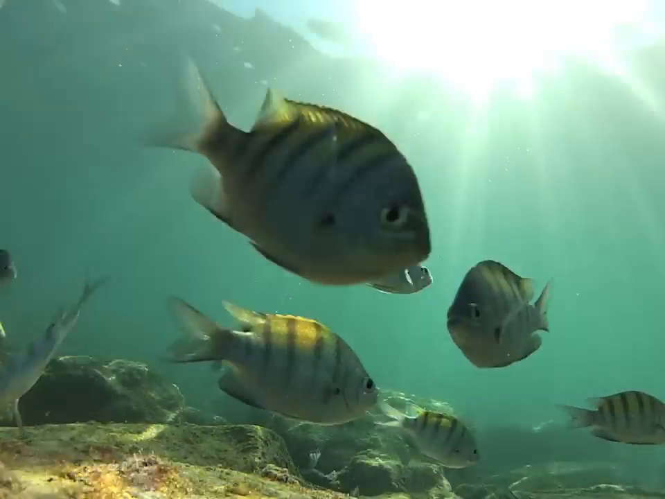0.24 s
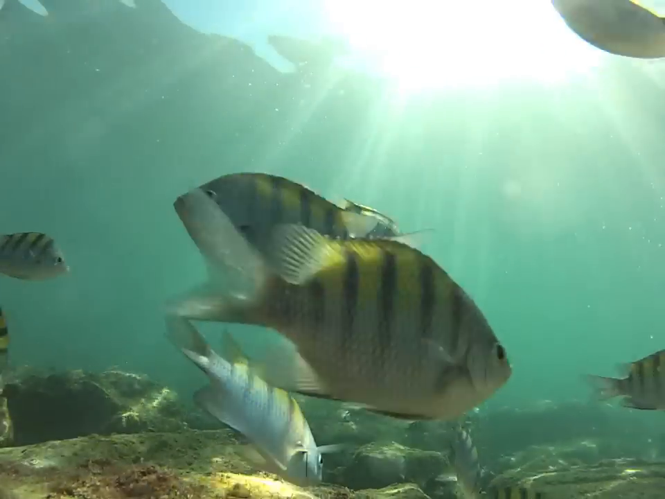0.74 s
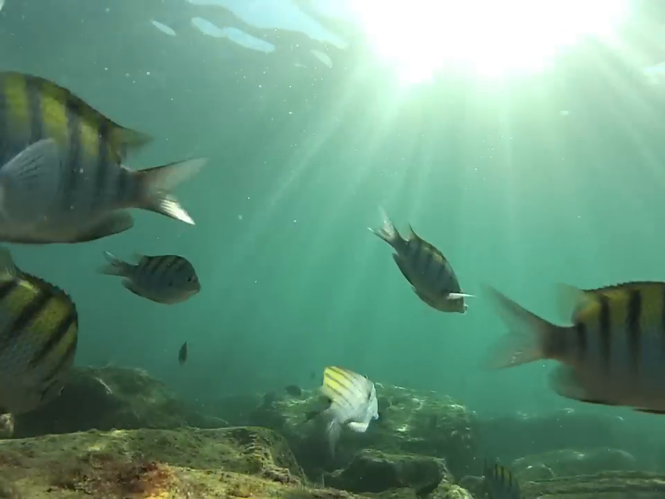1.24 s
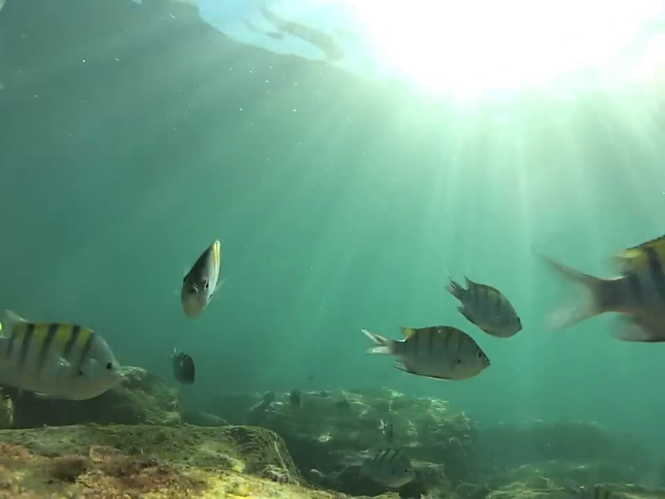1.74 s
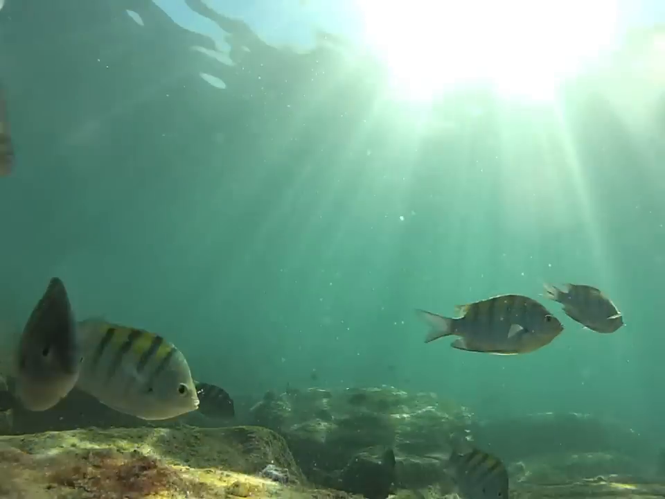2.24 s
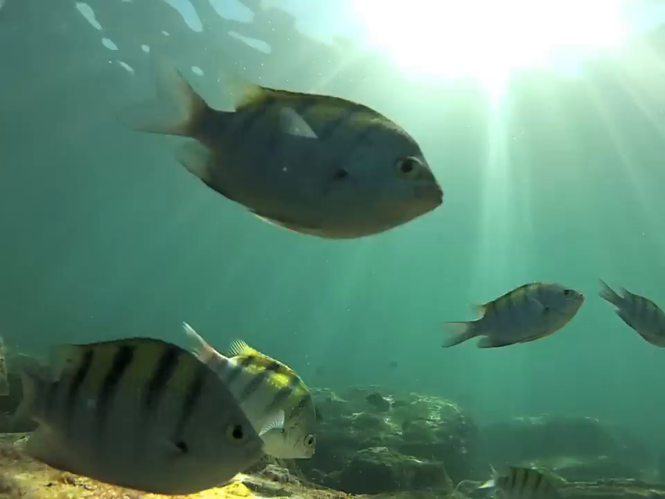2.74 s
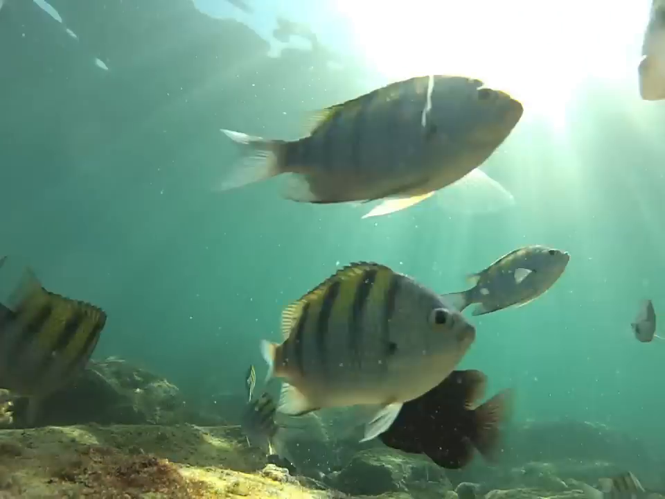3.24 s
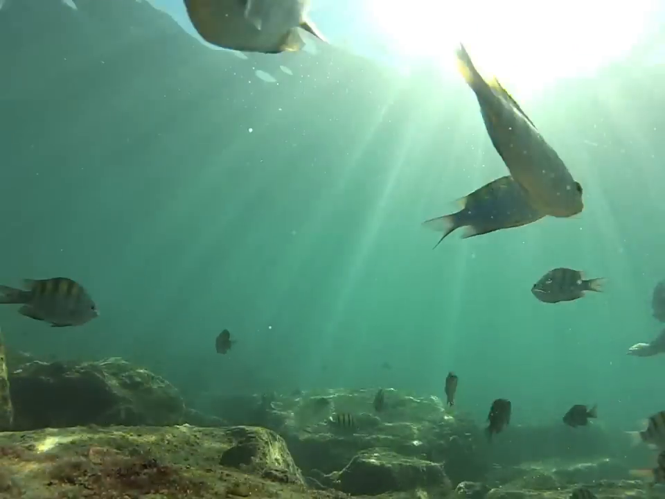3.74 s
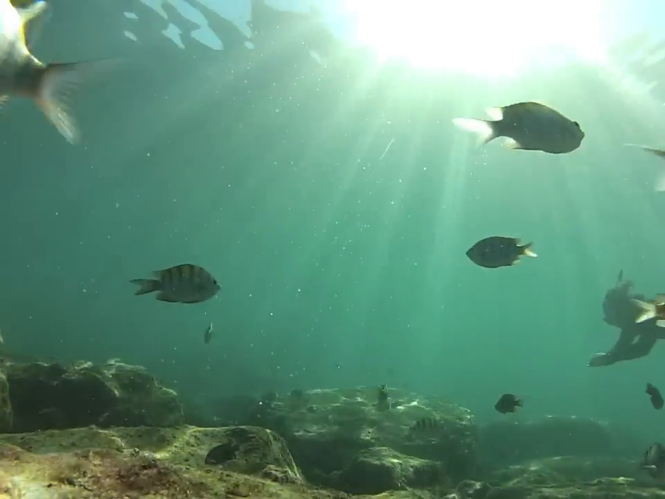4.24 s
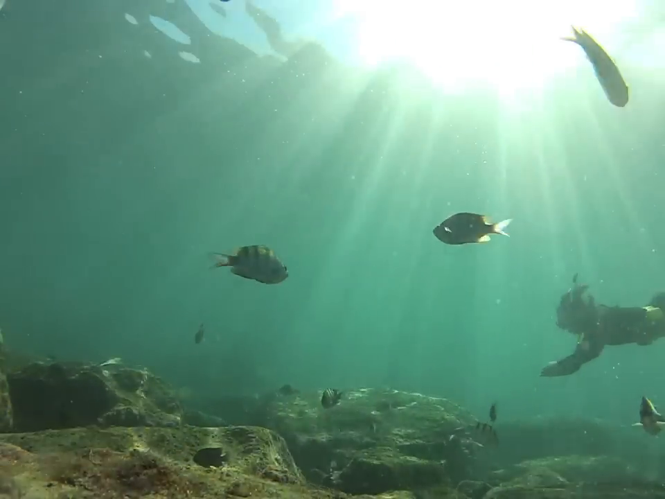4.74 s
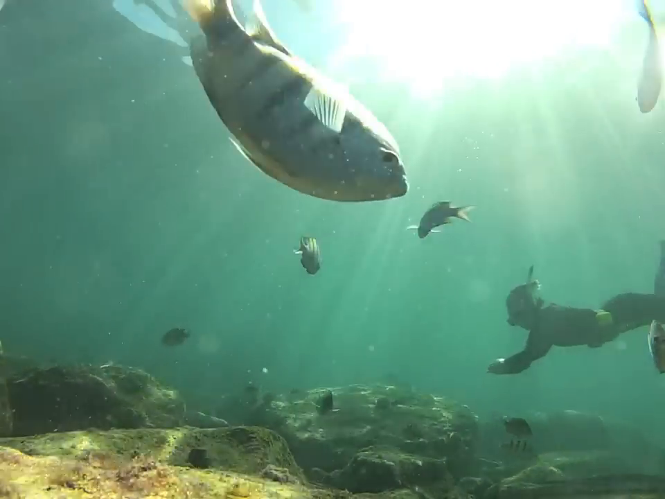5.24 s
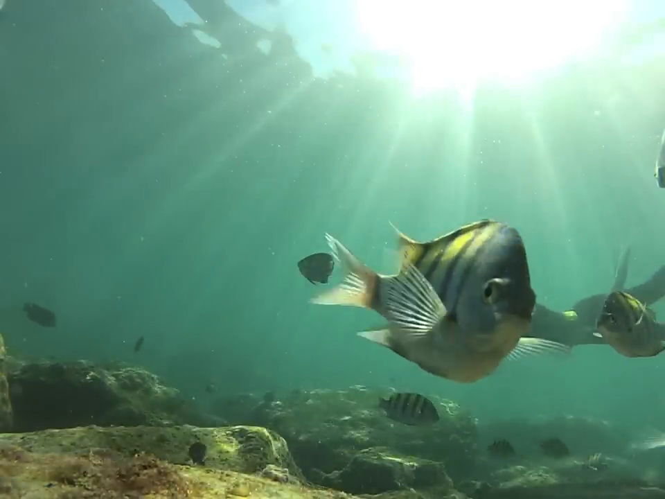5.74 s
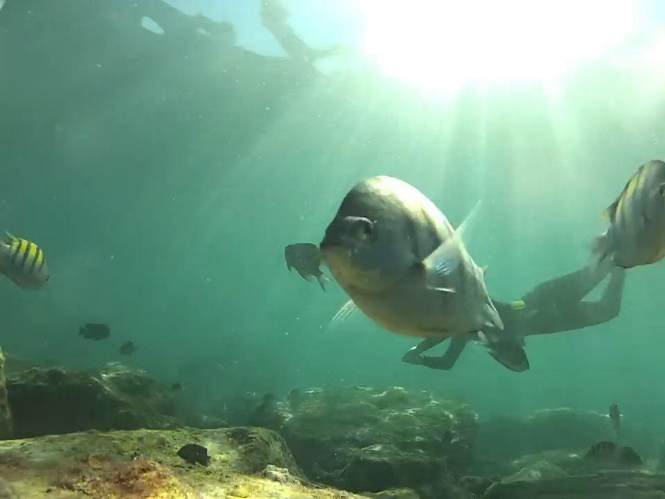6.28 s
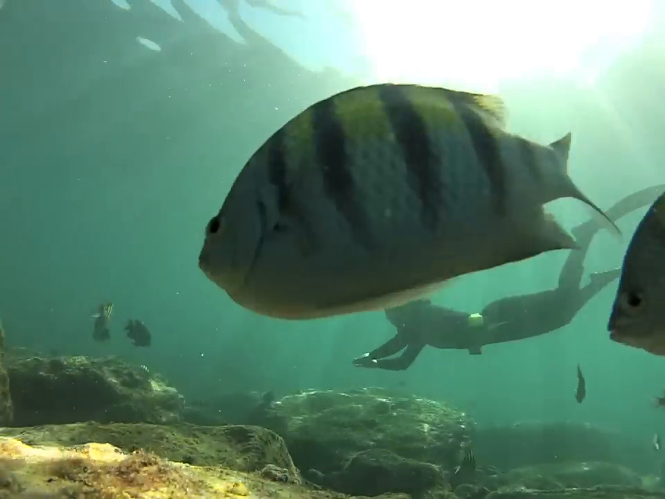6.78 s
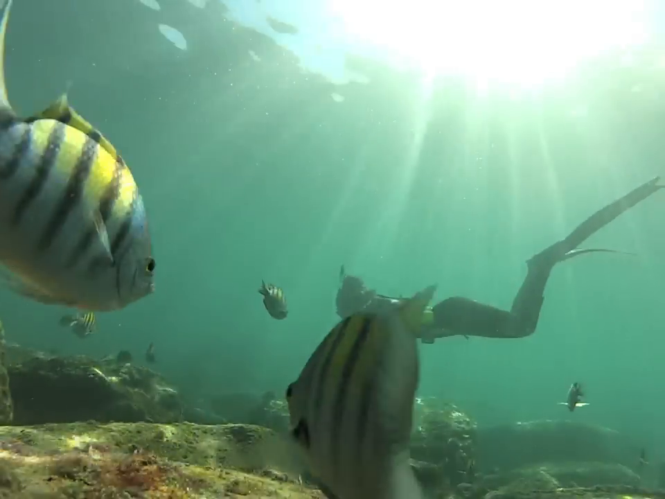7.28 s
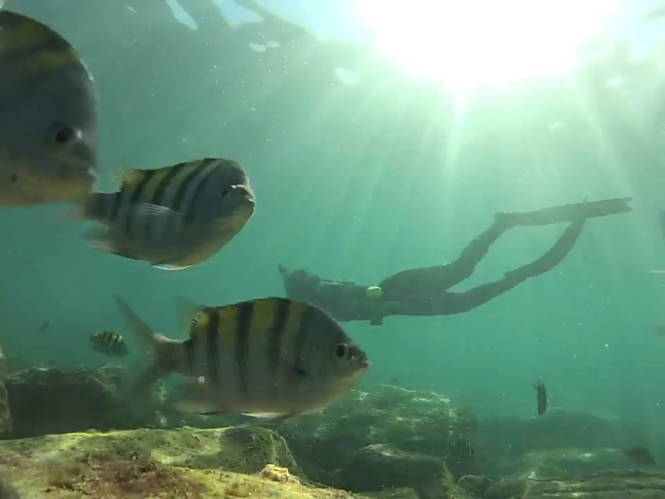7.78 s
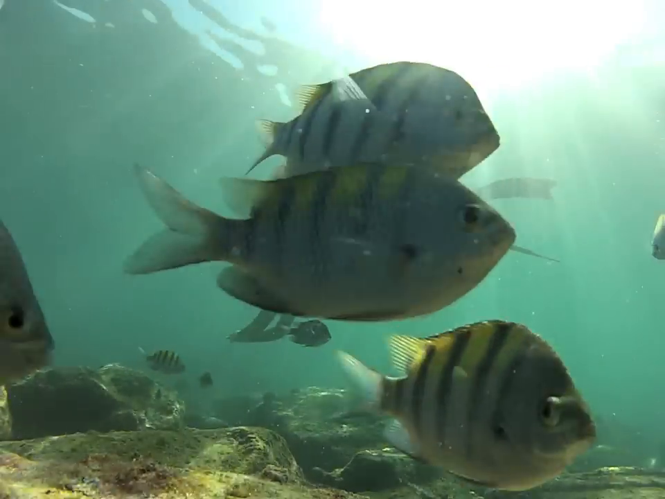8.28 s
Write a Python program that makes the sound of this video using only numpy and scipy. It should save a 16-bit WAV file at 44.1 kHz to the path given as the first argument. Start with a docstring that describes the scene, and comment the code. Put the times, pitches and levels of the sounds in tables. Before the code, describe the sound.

Muffled underwater crackle of shrimp clicks over a faint wash, with fish pops, housing rattles, a brief bubbly gurgle and one overloading knock midway.

```python
"""Shallow rocks among feeding fish; a small camera in a sealed housing lies there, one microphone for both
channels. From the start a far wash (shaped noise) and far shrimp (random clicks with echoes) lie under fish
pops and bubbles (short tones), rasping teeth (noise bursts) and near snaps; from 0.3 s a loose part chatters
(blows ring the housing). At 1.9 s a burst of air gurgles (a crowd of bubble tones); at 3.3 s two low pops
sound, and at 4.2 s one knock (swelling tones) overloads the input; four short pops follow near 5.4 s, and pops
and snaps run on towards the end."""
import sys
import numpy as np
from scipy import signal
from scipy.fft import rfft, irfft
from scipy.io import wavfile
from scipy.ndimage import uniform_filter1d

SR = 44100
rng = np.random.default_rng(int(sys.argv[2]) if len(sys.argv) > 2 else 0)


def pcm_store(signal):
    """Save signal as 16-bit PCM."""
    levels = np.round(np.clip(np.atleast_2d(signal), -1, 1) * 32767)
    wavfile.write(sys.argv[1], SR, levels.astype(np.int16).T)


N = 375732

# Event levels are peaks against full scale as each grain is mixed, ahead of the housing wall and the input;
# rasp levels are RMS.
# far wash of surf and countless snaps, spectrum: (frequency [Hz], relative level [dB])
WASH_SPECTRUM = [(12, -48), (20, -15.5), (195, -3), (273, -4), (428, 2), (729, -3), (1020, -12.5),
                 (1320, -8), (1560, -13), (4160, -21.5), (6170, -24.5), (10500, -27), (11800, -36.5),
                 (15200, -29.5), (16500, -60)]
# sound of a shrimp snap, filter: (frequency [Hz], gain [dB])
SNAP_SPECTRUM = [(880, -49), (1500, -29.5), (1830, -14), (2940, -3.5), (3480, -10), (4050, -3.5),
                 (4710, -3.5), (6110, -0.5), (8260, -9.5), (8860, -18), (10500, -11.5), (11700, -39),
                 (13900, -11), (16500, -30.5)]
# far shrimp colonies: (echo decay by 60 dB [s], centre frequency [Hz])
COLONIES = [(.01, 10970), (.015, 7530), (.03, 12060), (.04, 5000), (.06, 8000), (.09, 5950)]
# near fish, swim-bladder pops: (time [s], level [dB], pitch [Hz])
FISH_POPS = [(0.001, -29.5, 308), (0.045, -36, 670), (0.175, -41.5, 820), (0.46, -34, 540),
             (0.639, -21.5, 670), (0.762, -41.5, 715), (0.829, -36, 715), (1.546, -35.5, 720),
             (1.689, -38.5, 458), (1.898, -38, 654), (2.377, -38, 604), (2.412, -41, 640),
             (2.533, -33, 890), (2.565, -35.5, 920), (2.669, -40, 810), (2.707, -41.5, 660),
             (2.754, -39.5, 450), (2.905, -40, 900), (3.198, -15.5, 603), (3.327, -25.5, 905),
             (3.355, -33, 574), (3.371, -23, 880), (3.42, -43, 423), (3.517, -38.5, 430), (3.735, -37, 650),
             (3.89, -36.5, 950), (3.929, -38, 636), (4.032, -39.5, 776), (4.069, -39.5, 480),
             (4.081, -38.5, 574), (4.357, -37.5, 900), (4.463, -34.5, 540), (4.81, -33, 617),
             (7.171, -45, 595), (5.765, -40.5, 706), (5.858, -35.5, 500), (5.982, -33, 604),
             (6.68, -40, 656), (6.711, -36, 650), (6.795, -26, 585), (6.884, -39.5, 655),
             (7.673, -24.5, 726), (8.014, -31.5, 716), (8.04, -39, 610), (8.137, -44.5, 620),
             (8.21, -49.5, 614), (8.3475, -42, 710), (8.411, -44.5, 506), (8.442, -40.5, 810)]
# single bubbles, plus two tones of the housing ringing near 2 s (920 Hz and 1310 Hz): (time [s], level [dB],
# starting pitch [Hz])
SINGLE_BUBBLES = [(0.0638, -49, 2820), (0.0967, -46.5, 3650), (1.3109, -49.5, 2950), (1.878, -48, 780),
                  (1.977, -49, 920), (2.066, -44, 1310), (1.927, -29, 543), (1.956, -35.5, 470),
                  (1.985, -35.5, 443), (2.02, -37.5, 423), (2.0358, -43, 2330), (2.036, -37, 433),
                  (2.053, -46, 660), (2.0652, -47, 2440), (2.066, -45, 650), (2.091, -42, 597),
                  (2.106, -38.5, 543), (2.134, -36.5, 462), (2.148, -46, 412), (2.16, -45, 1940),
                  (2.169, -47, 617), (2.1839, -45, 2790), (2.2223, -41, 2340)]
# scratchy bursts, as of fish grazing the rock: (time [s], length [s], level [dB], centre frequency [Hz])
GRAZING = [(0.092, 0.042, -62.5, 3250), (1.297, 0.072, -60.5, 2720), (4.315, 0.029, -52.5, 3570),
           (4.918, 0.011, -47.5, 4500), (5.407, 0.021, -49, 2840), (6.035, 0.011, -55.5, 5220),
           (6.8156, 0.01, -32.5, 2800), (6.966, 0.0093, -60, 5030), (8.051, 0.018, -50.5, 4160)]
# near shrimp: (time [s], level [dB], gain of an added 1.1-4.3 kHz part [dB])
NEAR_SNAPS = [(0.1424, -34, -4.5), (0.197, -46, 5), (0.255, -40.5, -4), (0.483, -34, -30),
              (0.6729, -36, -7), (0.909, -32.5, -5), (0.962, -40, -19), (0.9868, -28, -7),
              (1.0246, -42, -6), (1.0594, -39, -5), (1.12, -45, -12), (1.1494, -43, -9), (1.164, -40, -7),
              (1.2676, -44.5, -14), (1.366, -41, -14), (1.3898, -38, 3), (1.651, -31.5, -6),
              (1.792, -40, 2), (1.975, -28.5, -11), (2.138, -44, 0), (2.1908, -44.5, -6),
              (2.3253, -24.5, -7), (2.4347, -38, -8), (2.5024, -30, -10), (2.541, -37, 2), (2.558, -39, -9),
              (2.672, -44, 0), (2.8292, -44, 17), (3.0117, -43, 11), (3.1152, -37, -2), (3.167, -40, 7),
              (3.261, -35.5, -3), (3.301, -44, 5), (3.4573, -38, -1), (3.558, -49, 0), (3.603, -35.5, -17),
              (3.735, -34.5, -7), (3.808, -27, -2.5), (3.9365, -39.5, -28), (4.072, -39, -13),
              (4.086, -25, -22), (4.151, -31, -34), (4.1953, -48, 27), (4.3095, -38.5, -3),
              (4.5372, -33, -10), (4.653, -25.5, -8), (4.829, -40.5, 1), (4.913, -28, -2),
              (4.9456, -32, -6), (5.0381, -39.5, -8), (5.2072, -36, 3.5), (5.245, -45, -2),
              (5.2938, -42.5, 1), (5.4126, -35, -2), (5.5154, -44, -4), (5.62, -34.5, -18),
              (5.68, -29, -13), (5.828, -42.5, -6), (5.8993, -33.5, -42), (6.18, -17.5, -20),
              (6.2896, -24, -23), (6.634, -43.5, -30), (6.818, -40, 14), (6.946, -41, 1),
              (7.0592, -32, -11), (7.1226, -39, 1), (7.335, -38.5, -8), (7.4748, -45, 14),
              (7.502, -22.5, -39), (7.5597, -39.5, -13), (7.889, -34.5, -5), (7.987, -38, -34),
              (8.0533, -33, -7), (8.0957, -48, -19), (8.308, -42, -11), (8.3332, -36.5, -4)]
# loose part of the housing: (time [s], level [dB], chatter gain ahead of REBOUND_DB [dB], chatter end [ms])
LOOSE_PART = [(0.2946, -27, 5, 14.2), (0.5536, -32, -4, 6), (0.674, -31, 6, 11), (0.8133, -30.5, 1.5, 12),
              (1.076, -30, 3.5, 10), (2.291, -29, 1.5, 24), (2.483, -31.5, 5, 8), (2.9271, -29.5, 3.5, 14),
              (2.9915, -31.5, 5, 14), (3.0774, -29.5, 4, 11), (3.1215, -29, 5, 14), (3.233, -30.5, 5, 7.4),
              (3.2985, -33.5, 6, 11.4), (3.321, -29, 12, 18), (3.434, -30, 6, 11), (3.649, -31.5, 5, 10.6),
              (3.833, -26.5, 1.5, 14.5), (4.3835, -30, 11, 9.1), (4.445, -33.5, 12, 17),
              (4.6176, -28, 5.5, 13), (4.7027, -30.5, 3.5, 13), (4.7225, -26.5, 5.5, 11),
              (4.801, -35.5, 1, 11), (4.84, -27.5, 5, 11.4), (4.8998, -25.5, -2, 14.6),
              (5.068, -29, 4.5, 13.3), (5.12, -27, 2, 13.3), (5.1797, -24.5, 0.5, 12),
              (5.3303, -29.5, 12, 7.1), (5.562, -25.5, 1.5, 12), (5.71, -37, -5, 7.3),
              (5.759, -37.5, -8, 8.7), (5.796, -33, 5, 16), (5.8799, -38, 6, 10.6), (6.055, -38.5, 7, 9.6),
              (6.077, -28, -1, 6.3), (6.1518, -28.5, 27, 7.6), (6.246, -28.5, 7, 7), (6.337, -26, 7.5, 8.1),
              (6.451, -36.5, 13.5, 6.2), (6.9493, -29.5, 8, 14.4), (7.045, -31.5, 4.5, 11),
              (7.1174, -33.5, 6.5, 10), (7.1894, -36.5, 14, 16), (7.2773, -31, 10.5, 9.7),
              (7.3627, -30, 7, 9.4), (7.4439, -37.5, 10, 12.5), (7.515, -26, 1.5, 11.6),
              (7.7235, -31, 3.5, 10), (7.939, -32, 6.5, 9.8)]
# modes of the housing: (frequency [Hz], first contact gain [dB], chatter gain [dB], decay by 60 dB [s])
HOUSING_MODES = [(452, 1.5, 8, 0.0071), (908, 4, 0.5, 0.023), (1293, 6.5, -5, 0.021),
                 (2160, 17, -2, 0.0016)]
# two low pops, one knock (three tones) and four short pops: (time [s], level [dB], pitch [Hz], decay by 60 dB
# [s], rise [s])
LOW_POPS_AND_KNOCK = [(3.3302, -25.5, 407, 0.0053, 0.0028), (3.3727, -27.5, 420, 0.0047, 0.0031),
                      (4.1949, -11, 700, .005, .001), (4.1954, 3.5, 600, .0058, .0028), (4.1965, -24, 2800, .005, .0004),
                      (5.3756, -31.5, 587, 0.011, 0.00089), (5.404, -36.5, 647, 0.011, .0012),
                      (5.470, -32, 580, 0.01, 0.00096), (5.495, -40.5, 597, .007, 0.0019)]
# input hiss, spectrum: (frequency [Hz], relative level [dB])
HISS_SPECTRUM = [(20, -10.0), (150, 0.5), (500, -6), (2000, -23.5), (6000, -15.0), (16000, -23.5)]

WASH_DB, FLICKER_DB = -59.5, 0.8  # RMS ahead of the flicker; flicker spread
CLUSTER_DB = 4  # spread of a colony's flurries
POP_RISE_CYCLES, POP_FADE_CYCLES = 1.47, 10.3  # in cycles of the pop's pitch; the fade holds at -20 dB
POP_FADE_PER_DB = .2  # weak pops die sooner: dB of fade length per dB of level
BUBBLE_T60_S, BUBBLE_SLOPE = 0.052, 0.6  # ring at 1 kHz; smaller bubbles fade sooner by this power of pitch
# rock echoes of a near snap: loud ones are dry, weaker ones from further off trail longer
TAIL_S, TAIL_AT_DB, TAIL_GROWTH_PER_DB, TAIL_SCATTER = 0.043, -36.5, 0.15, 0.28
SMALL_BRIGHT_PER_DB = 0.8  # smaller shrimp snap weaker and brighter
CHATTER_HZ, CHATTER_START_S, REBOUND_DB = 452, .0027, -5
GURGLE_START_S, GURGLE_END_S, GURGLE_T60_S = 1.88, 2.27, .035  # a burst of air breaks up nearby
DEAD_HZ = 1560  # the housing wall passes little here
HISS_DB, TOP_HZ = -80, 16000


def undb(db):
    """Amplitude ratio of a level in dB."""
    return 10 ** (np.asarray(db) / 20)


def level(x, db):
    """Bring a sound to an RMS level in dB."""
    return x * undb(db) / np.sqrt(np.mean(x ** 2))


def sos(order, hz, kind):
    """Butterworth filter sections."""
    return signal.butter(order, hz, kind, fs=SR, output="sos")


def colour(x, table):
    """Causal filter with the spectrum of a (Hz, dB) table, from the folded cepstrum."""
    hz, db = np.transpose(table)
    grid = np.arange(1, 1026) * SR / 2048
    cepstrum = irfft(np.log(undb(np.interp(np.log(grid), np.log(hz), db))))
    cepstrum[1:1024] *= 2
    cepstrum[1025:] = 0
    impulse = irfft(np.exp(rfft(cepstrum)))
    return signal.fftconvolve(x, impulse)[:len(x)]


def ring(x, hz, t60):
    """One mode, set ringing by x and losing 60 dB in t60 seconds."""
    pole = np.exp(2j * np.pi * hz / SR - np.log(1000) / (t60 * SR))
    return signal.lfilter([1], [1, -pole], x).imag


def housing_rings(x, second_db, second_t60, third_db, third_t60):
    """Add the housing's second and third modes, faintly excited by x."""
    second = undb(second_db) * ring(x, HOUSING_MODES[1][0], second_t60)
    third = undb(third_db) * ring(x, HOUSING_MODES[2][0], third_t60)
    return x + second + third


def add(out, s, grain, db):
    """Mix a grain in at time s with the given peak."""
    i = int(max(s, 0) * SR)
    out[i:i + len(grain)] += (grain * undb(db) / np.abs(grain).max())[:N - i]


def blip(hz, rise, t60, glide=0.):
    """A short tone: smooth swell, exponential fade; the pitch changes by the fraction glide per t60."""
    t = np.arange(int((rise + t60) * SR)) / SR
    swell = np.sin(np.pi / 2 * np.clip(t / rise, 0, 1)) ** 2
    fade = undb(-60 * np.clip(t - rise, 0, None) / t60)
    return -swell * fade * np.sin(2 * np.pi * hz * (t + glide * t ** 2 / (2 * t60)))


def wander(rate):
    """Random levels held 1 / rate s and slewed."""
    k = int(SR / rate)
    return uniform_filter1d(np.repeat(rng.standard_normal(N // k + 1), k), k)[:N]


def snap(noise, t60):
    """A weak click as the claw shuts, the collapse of its bubble with close rock echoes, and a fading tail."""
    t = np.arange(len(noise)) / SR - .0007  # the bubble collapses at zero
    echoes = np.exp(-t / (.0005 + .03 * t60)) + undb(-12 - 60 * t / t60)
    grain = noise * np.where(t > 0, echoes, .12)
    grain[0], grain[np.argmax(t > 0)] = -1.2, 4.0
    return grain


def sea():
    """Far wash of surf and countless snaps: shaped noise whose low and high parts flicker on their own."""
    wash = level(colour(rng.standard_normal(N), WASH_SPECTRUM), WASH_DB)
    low = signal.sosfiltfilt(sos(2, 900, "low"), wash)
    return sum(part * undb(FLICKER_DB * wander(28)) for part in (low, wash - low))


def far_shrimp():
    """Distant colonies: random clicks, each colony with its own echo pattern and colour."""
    far = 0
    for t60, hz in COLONIES:
        clicks = np.zeros(N)
        clicks[rng.integers(0, N, size=380)] = undb(np.minimum(7.0 * rng.exponential(size=380), 17))
        clicks *= undb(CLUSTER_DB * wander(5.8))  # a colony snaps in flurries
        band = sos(1, [0.43 * hz, 1.7 * hz], "band")
        echo = signal.sosfilt(band, snap(rng.standard_normal(3000), t60))
        far = far + signal.fftconvolve(clicks, echo)[:N]
    bright = signal.sosfilt(sos(1, 9000, "high"), far)
    return level(colour(far + undb(13.0) * bright, SNAP_SPECTRUM), -66.5)


def far_fish():
    """Distant fish: weak pops of scattered pitch."""
    out = np.zeros(N)
    for when, pitch, strength in rng.random((600, 3)):
        add(out, when * N / SR, blip(300 * 3 ** pitch, .002, .013), -54 - 3.5 * np.log(strength + .12))
    return out


def stray_bubbles():
    """Tiny bubbles all around, each ringing briefly and gliding up."""
    out = np.zeros(N)
    for when, pitch, strength in rng.random((200, 3)):
        grain = blip(1000 * 3.6 ** pitch, .001, .012, glide=.1)
        add(out, when * N / SR, grain, -64 - 3 * np.log(strength + .05))
    return out


def fish_pops():
    """Swim-bladder pops that swell over about a cycle and a half, then die away."""
    out = np.zeros(N)
    for s, db, hz in FISH_POPS:
        fade = POP_FADE_CYCLES / hz * undb(POP_FADE_PER_DB * (db + 20))
        add(out, s, blip(hz, POP_RISE_CYCLES / hz, fade), db)
    return out


def single_bubbles():
    """Each bubble rings at its size and glides down a little; two tones near 2 s are the housing ringing at
    about 0.9 and 1.3 kHz."""
    out = np.zeros(N)
    for s, db, hz in SINGLE_BUBBLES:
        t60 = BUBBLE_T60_S * (1000 / hz) ** BUBBLE_SLOPE
        add(out, s, blip(hz, 0.88 / hz, t60, glide=-0.034), db)
    return out


def rasps():
    """Teeth scrape in a run of uneven clicks: band-passed noise in steps of random strength."""
    out = np.zeros(N)
    for s, length, db, hz in GRAZING:
        n, i = int(length * SR), int(s * SR)
        strength = undb(1.0 * rng.exponential(size=n // 30 + 1)).repeat(30)[:n]
        clicks = rng.standard_normal(n) * strength
        scrape = signal.sosfilt(sos(2, [0.33 * hz, 1.33 * hz], "band"), clicks)
        shape = np.hanning(n) ** 0.25 * undb(np.linspace(0, -16, n))
        out[i:i + n] += level(scrape * shape, db)
    return out


def near_shrimp():
    """Near snaps at their own moments, the weaker ones brighter and longer in their rock echoes."""
    out = np.zeros(N)
    low_band, top = sos(2, [1100, 4300], "band"), sos(1, 9000, "high")
    for s, db, low_db in NEAR_SNAPS:
        scatter = TAIL_SCATTER * rng.standard_normal()
        t60 = TAIL_S * np.exp(TAIL_GROWTH_PER_DB * (TAIL_AT_DB - db) + scatter)
        raw = snap(rng.standard_normal(2600), t60)
        raw = raw + (undb(SMALL_BRIGHT_PER_DB * (-33 - db)) - 1) * signal.sosfilt(top, raw)
        low = undb(low_db) * signal.sosfilt(low_band, raw)
        add(out, s, colour(raw, SNAP_SPECTRUM) + low, db)
    return out


def taps():
    """A loose part strikes once firmly, then in a few uneven rebounds, all ringing the housing."""
    out, contact = np.zeros(N), sos(3, [240, 3000], "band")
    for s, db, chatter_db, length_ms in LOOSE_PART:
        tick, chatter = np.zeros(2600), np.zeros(2600)
        tick[0] = -1
        spacing = np.arange(7) / CHATTER_HZ * (1 + 0.037 * rng.standard_normal())
        at = (CHATTER_START_S + spacing + 0.00026 * rng.standard_normal(7)) * SR
        strength = undb(chatter_db + REBOUND_DB + 2.5 * rng.standard_normal(7))
        chatter[at.astype(int)] = strength * np.clip(length_ms - 1000 * at / SR, 0, 1)
        chatter = np.convolve(chatter, np.hanning(18) / 8.5)[:2600]  # rebounds are softer
        # each blow lands a little differently and favours other modes
        detune = 1 + .015 * rng.standard_normal(4)
        favour = undb(2.2 * rng.standard_normal(4))
        grain = 0
        for (hz, tick_db, mode_chatter_db, t60), d, g in zip(HOUSING_MODES, detune, favour):
            blows = undb(tick_db) * tick + undb(mode_chatter_db) * chatter
            grain = grain + g * ring(blows, d * hz, t60)
        add(out, s, signal.sosfilt(contact, grain), db)
    return out


def gurgle():
    """A burst of air breaks up into a crowd of bubbles, densest midway, each gliding up."""
    out = np.zeros(N)
    for early, pitch, strength, late in rng.random((280, 4)):
        hz = 400 * 8 ** pitch ** 1.216
        s = np.interp((early + late) / 2, (0, 1), (GURGLE_START_S, GURGLE_END_S))
        add(out, s, blip(hz, 2 / hz, GURGLE_T60_S, glide=0.054), -52 - 9 * pitch + 5 * strength)
    return out


def low_pops_and_knock():
    """Two low pops, a knock and four short pops: low tones that swell and fade, the knock beyond full scale."""
    out = np.zeros(N)
    for s, db, hz, t60, rise in LOW_POPS_AND_KNOCK:
        add(out, s, blip(hz, rise, t60), db)
    return out


def scene():
    """All but the fish calls and knocks pass the notch of the housing wall; both channels are alike."""
    bubbles = housing_rings(stray_bubbles() + single_bubbles() + gurgle(), -43.0, .06, -55, 0.051)
    fish = housing_rings(far_fish() + fish_pops() + low_pops_and_knock(), -44, 0.04, -45.5, 0.03)
    water = sea() + far_shrimp() + bubbles + rasps() + near_shrimp() + taps()
    through_wall = signal.lfilter(*signal.iirnotch(DEAD_HZ, 7.0, fs=SR), water)
    return np.tile(through_wall + fish, (2, 1))


def record(dry):
    """Hard clipping, hiss of opposite sign in the channels, a drift after overload that parts them, top cut."""
    hiss = level(colour(rng.standard_normal(N), HISS_SPECTRUM), HISS_DB)
    over = np.maximum(dry[0] - 1, 0)
    smeared = uniform_filter1d(over, 50, origin=24)  # looks back only
    drift = signal.sosfilt(sos(1, [9, 70], "band"), smeared)
    wet = np.clip(dry, -1, 1) + np.outer([1, -1], hiss) + np.outer([2.1, -2.4], drift)
    top_cut = signal.ellip(8, .2, 45, TOP_HZ, fs=SR, output="sos")
    return np.clip(signal.sosfilt(top_cut, wet), -1, 1)


dry = scene()
out = record(dry)
pcm_store(out)
```